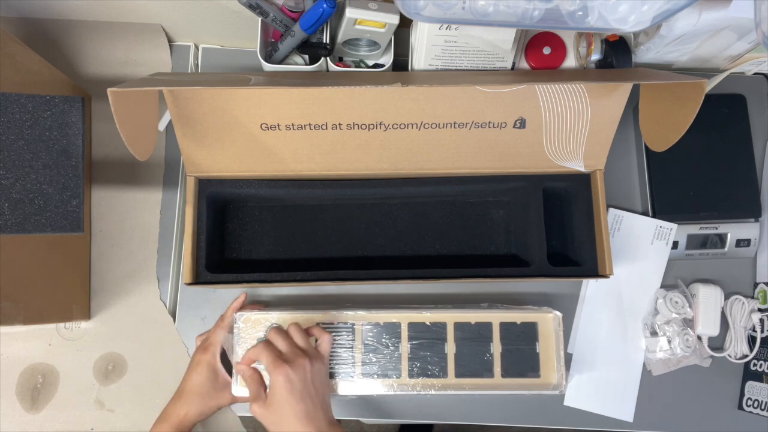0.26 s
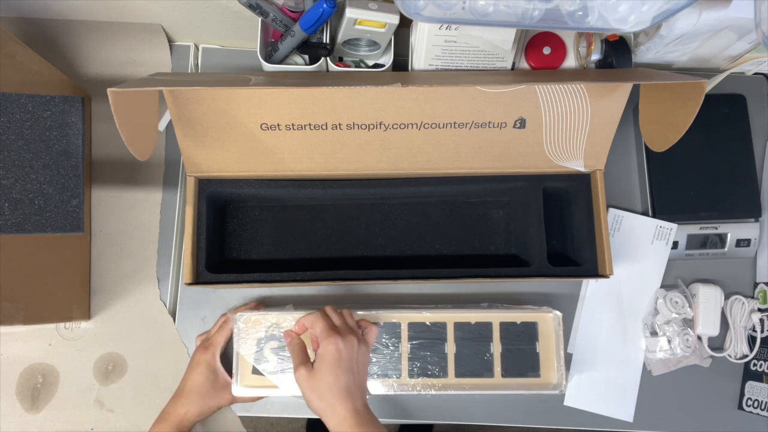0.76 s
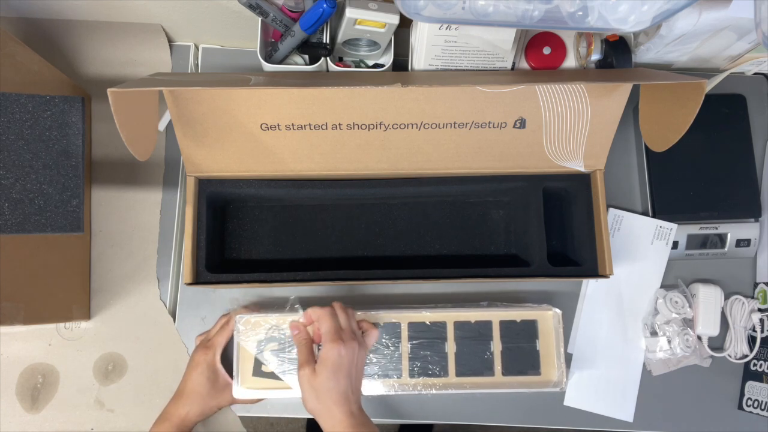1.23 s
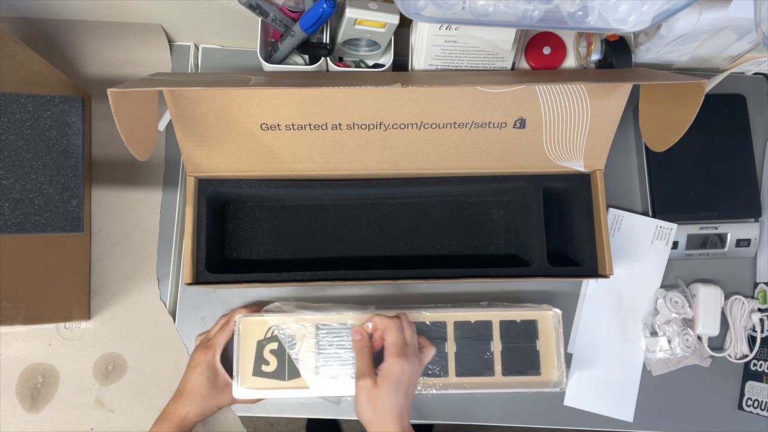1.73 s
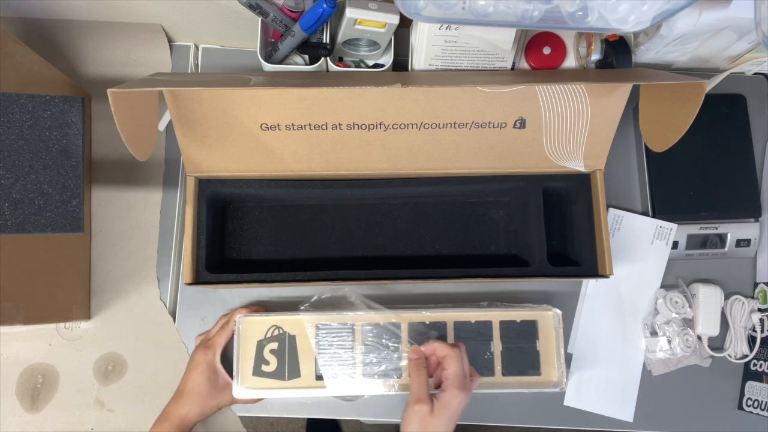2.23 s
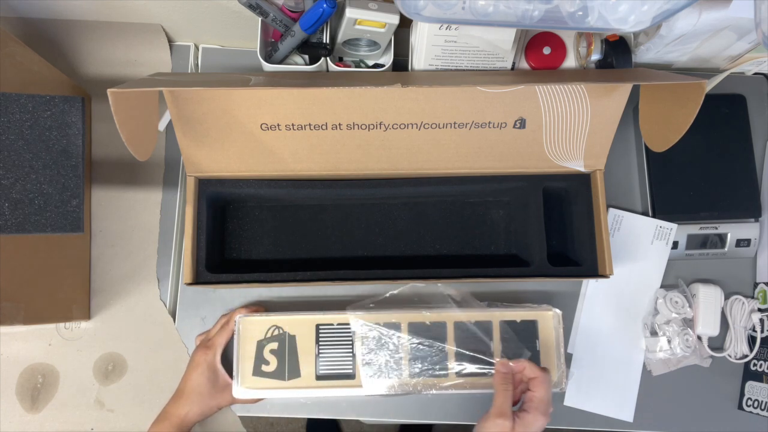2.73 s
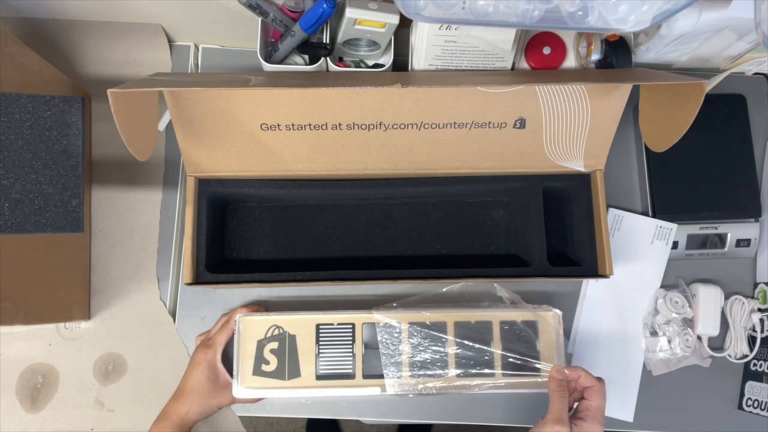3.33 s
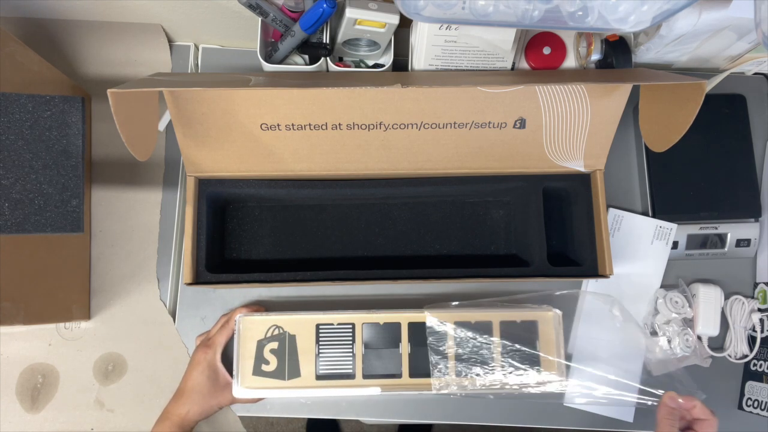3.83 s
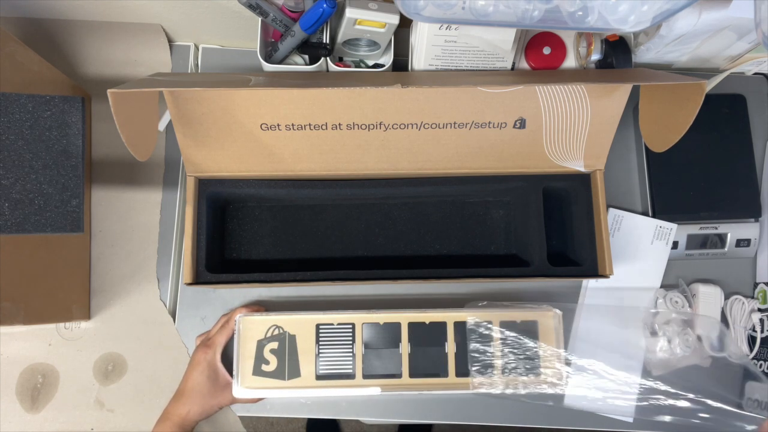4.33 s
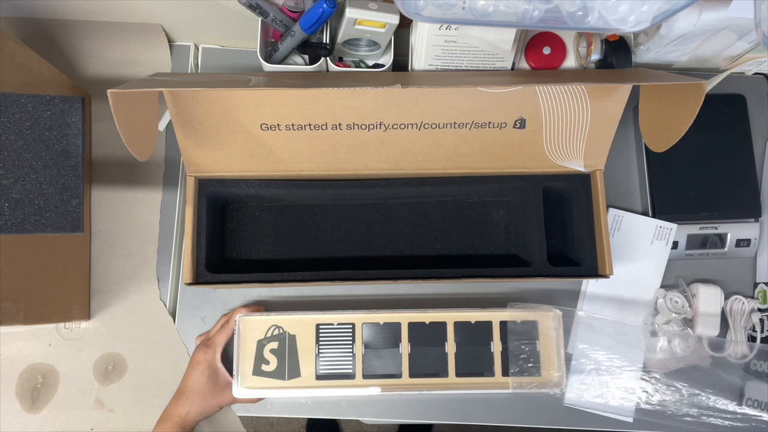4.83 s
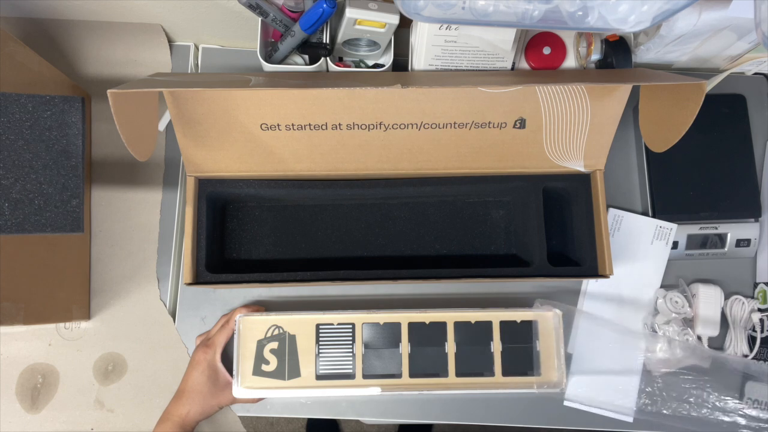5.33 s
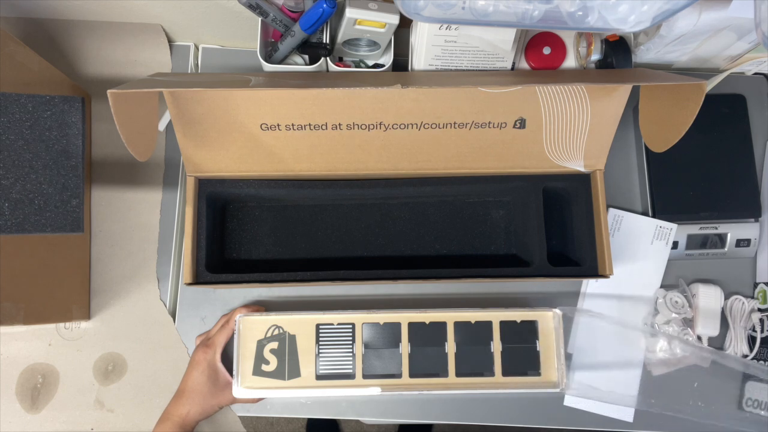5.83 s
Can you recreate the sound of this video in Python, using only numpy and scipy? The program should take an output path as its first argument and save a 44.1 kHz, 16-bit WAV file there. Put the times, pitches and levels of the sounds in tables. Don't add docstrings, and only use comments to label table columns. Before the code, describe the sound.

Close-up plastic film peeling: short scratchy tugs and crackles, then long rasping zips with a hollow woody ring, in a quiet room.

```python
import sys
import numpy as np
from scipy import signal
from scipy.fft import rfft, irfft
from scipy.io import wavfile
from scipy.ndimage import uniform_filter1d, map_coordinates

SR = 44100
rng = np.random.default_rng(int(sys.argv[2]) if len(sys.argv) > 2 else 0)


def transcribe(signal):
    frames = np.atleast_2d(signal).T
    limited = np.clip(frames, -1, 1)
    pcm = np.round(limited * 32767).astype(np.int16)
    wavfile.write(sys.argv[1], SR, pcm)


def linear_from_db(decibels):
    return 10 ** (np.asarray(decibels, float) / 20)


N = 267687
T = np.arange(N) / SR
HZ = np.fft.rfftfreq(N, 1 / SR)

# (start [s], length [s], hiss at start [dB], hiss at end [dB])
TUGS = [(0, 0.12, -42, -35.5), (0.112, 0.086, -38.5, -40), (0.19, .026, -48, -53),
        (0.223, 0.0053, -41, -56), (0.26, 0.15, -69, -77), (0.454, 0.072, -61, -56.5),
        (0.524, 0.13, -44, -42), (0.667, 0.045, -50, -56.5), (0.74, 0.19, -63.5, -65),
        (0.954, 0.22, -51, -44.5), (1.195, 0.035, -37.5, -35), (1.231, .012, -36, -32),
        (1.262, 0.01, -32, -35), (1.278, 0.025, -35.5, -38), (1.352, 0.15, -55, -33.5),
        (1.47, 0.28, -35.5, -38), (1.761, 0.15, -35.5, -42), (1.89, 0.18, -41, -44.5),
        (2.043, 0.15, -36, -36), (2.214, 0.14, -34.5, -37), (2.368, 0.25, -37, -32.5),
        (2.633, 0.078, -34, -34.5), (2.726, 0.09, -35.5, -36), (2.824, 0.072, -35, -33),
        (2.909, 0.16, -32.5, -38), (3.268, 0.042, -61, -61), (3.362, 0.055, -35.5, -33.5),
        (3.42, 0.099, -33, -33.5), (3.529, 0.16, -33.5, -35), (3.704, 0.29, -36, -35),
        (4.008, 0.22, -33.5, -35.5), (4.245, 0.23, -34.5, -35), (4.45, 0.18, -36.5, -37.5),
        (4.632, 0.29, -37.5, -32.5), (4.905, 0.1, -34.5, -35.5), (5.008, .07, -36, -40.5),
        (5.101, 0.084, -39.5, -32.5), (5.204, 0.23, -32, -35.5), (5.373, 0.18, -34, -34.5),
        (5.518, 0.21, -40.5, -30.5), (5.699, 0.23, -30.5, -38), (5.956, 0.025, -33, -33),
        (5.981, .012, -28, -35.5)]
GRIP_DB_PER_S, LET_GO_DB_PER_S, CREEP_DB = 656, 497, -77.5
SLIPS_PER_S, SLIP_S, SLIP_DB = 75, .003, 9
# (frequency [Hz], level [dB per Hz])
FILM_SPECTRUM = [(120, -18.5), (300, -16), (1000, -9.5), (2500, -1), (4300, -2), (7000, -2), (9000, -5),
                 (12000, -11), (16000, -13.5)]
# (peeled share [0-1], treble [dB])
SHEEN = [(0, 0.5), (.05, -1), (.2, 0.5), (.35, 0.5), (.44, -0.5), (.5, 0), (.65, 0), (.78, -1.5),
         (.86, -3.5), (.92, -3), (1, -2)]
SHEEN_HZ = 4800
# (frequency [Hz], width [Hz], level [dB])
PANEL_MODES = [(1332, 61, -7), (1531, 66, -2), (1764, 91, -2)]
BOARD_MODES = [(817, 360, -5.5), (963, 106, 1), (1059, 90, 0)]
HOLLOW_MODES = [(224, 55, -14), (379.5, 40, -11), (525, 38, 3), (565, 22, 1), (610, 50, -2)]
PANEL_MID_MODES = [(1998, 89, -2.5), (2285, 63, 2.5), (2510, 98, -4.5)]
PANEL_TOP_MODES = [(2850, 77, -8), (3020, 88, -2), (3300, 93, 0), (3410, 45, -16), (3670, 80, -8)]
# (peeled share [0-1], panel [dB], board [dB], hollow [dB])
ZONES = [(0, -15, 0.5, -6), (.022, 0, -0.5, -14), (0.044, -3, -2.5, 2), (0.047, -1.5, -12, -14.5),
         (.23, -11.5, -15, -13.5), (.3, 1.5, -8, -12.5), (.34, -2.5, -6.5, -12.5), (.38, -2, -11, -24),
         (.42, -0.5, -11, -19), (.45, -2.5, -9, -12), (.48, 2, -12, -18), (.56, 2.5, -15, -23),
         (.6, 1.5, -18, -18), (.64, 2, -17, -23), (.68, -0.5, -27, -20), (.72, -0.5, -11, -11),
         (.76, -2, -18.5, -13.5), (.78, 3, -13, -7.5), (0.798, 1.5, -16, -3.5), (.83, 4, -12.5, -7.5),
         (.86, 3.5, -11, -3.5), (.89, 7, -12, -4.5), (.94, 1.5, -12, -9), (1, 2.5, -4.5, -9)]
# (peeled share [0-1], middle modes [dB], top modes [dB])
UPPER_ZONES = [(0, -6, -15), (.04, 1, -3), (.05, -8, -3), (.15, -31, -11), (.23, -10, -16), (.3, 4, 1),
               (.34, -1.5, -2), (.38, 3.5, -2), (.42, 2.5, -5), (.45, -1.5, -18), (.48, 2.5, -8),
               (0.532, -2.5, -37), (.58, -3, -6), (.64, -7, -5), (.72, -2, -13), (.8, -9, -3),
               (.86, -6, -3.5), (.9, 0, 3), (.93, 1, -5), (1, -1.5, -2)]
SLACK_RING_DB = 0.5
# (time [s], pitch [Hz], level over the hiss [dB])
STRIP = [(0, 2310, -16), (.1, 2270, 1), (.17, 2260, -15), (.2, 2300, -40), (2.3, 3150, -40),
         (2.45, 3130, -14), (2.7, 3270, -2), (2.95, 3300, -6), (3.1, 3400, -38), (6.07, 3350, -37)]
STRIP_WIDTH_HZ = 60
# (time [s], peak [dB], top octave over middle [dB])
TICKS = [(0.333, -37, 0), (.3755, -53, -9), (0.3967, -56, -2), (.416, -48, 6), (.4205, -47, -11),
         (0.431, -50, 8), (.4509, -37, 4), (.4558, -32, -6), (.5057, -25, -4), (.4928, -31, 5),
         (.5152, -35, 3), (.6754, -30, -11), (.709, -32, -6), (.7587, -28.5, 8), (.775, -33, -6),
         (0.782, -42, -3), (.789, -40, -6), (.811, -33, 10), (0.816, -37, -1), (.827, -32, -4),
         (.853, -43, -17), (.8564, -30, 9), (0.862, -36, 6), (0.8807, -33, 2), (.8845, -39, 10),
         (.895, -38, 11), (.9085, -38, 0), (.922, -37, -5), (0.933, -25, 15), (0.937, -30, 5),
         (.9465, -27, -4), (.9575, -26, -7), (.9705, -39, -11), (.980, -29, -6), (0.9948, -24, 3),
         (1.0145, -26, 2), (1.034, -26, 0), (1.063, -17, 2), (1.082, -26, -3), (1.0995, -30, -7),
         (1.116, -32, -5), (1.1455, -33, 0), (1.192, -23, 0), (1.41, -25, 3), (2.031, -16.5, 2),
         (3.188, -32, 0), (3.226, -42.5, 1), (3.239, -39, 0), (3.2824, -36, 0), (3.2894, -30, 4),
         (3.294, -33, 0), (3.3044, -31, -1), (3.320, -33, 3)]
# (time [s], peak [dB])
NAIL_CATCHES = [
    (0.2242, -20.5),
    (0.227, -27),
    (0.2288, -16),
    (0.448, -31),
    (3.338, -33),
    (3.3492, -31),
    (3.358, -24),
]
TICK_KNOCK_DB, NAIL_KNOCK_DB = -38, -5.5
# (frequency [Hz], level [dB per Hz])
CREASE_SPECTRUM = [(1000, -40), (3000, -21), (5500, -8.5), (8000, -8.5), (11000, -11), (16000, -16)]
CRACKLE_PER_S, CRACKLE_DB = 81, -69
TICK_TOP_HZ = 8060
# (time [s], peak [dB])
PATS = [(0.309, -45), (.327, -52), (.349, -51), (.722, -53), (0.733, -50), (0.748, -50), (.755, -54),
        (0.764, -54), (.774, -57), (0.86, -47.5), (.930, -51), (0.953, -51), (1.521, -31.5), (3.348, -39)]
PAT_S = .004
# (frequency [Hz], width [Hz], level [dB])
PAT_MODES = [(450, 190, -2), (1012, 350, -0.5), (1540, 510, -1)]
# (time [s], peak [dB], pitch [Hz])
THUMPS = [(0.047, -28.5, 99.4), (0.059, -27.5, 78.3), (0.117, -33, 64), (0.158, -35.5, 88.4),
          (0.752, -40, 76.7), (1.196, -40, 64), (1.277, -36, 77.6), (1.447, -43, 97), (1.529, -36, 81),
          (1.65, -41, 58.3), (1.769, -49, 55.7), (3.11, -39.5, 215), (5.968, -36, 55.4)]
# (time [s], left port leads by [ms])
FRONT_LEAD = [(0, 0.15), (1, 0.2), (2, 0.16), (2.6, 0.081), (3.2, 0.046), (4, 0.027), (5, -0.026),
              (6, -0.086)]
# (time [s], left port late [ms], right port late [ms])
LID_DELAY = [(0, 3.1, 2.9), (1, 3.4, 2.8), (3.3, 3.3, 2.7), (4, 3.05, 2.6), (5, 2.7, 2.65),
             (5.75, 2.42, 2.5), (6.07, 2.35, 2.45)]
LID_DB = -8
# (frequency [Hz], level [dB])
DESK_SPECTRUM = [(100, -7), (500, 1), (1400, -1), (3000, -1), (6000, 0.5), (16000, -4.5)]
DESK_T60_S, ROOM_T60_S, ROOM_DB = 0.067, 0.29, -5
RING_ECHO_DB, HOLLOW_ECHO_DB, TICK_ECHO_DB = -5.5, -5, -3.5
# (frequency [Hz], level [dB per Hz])
FAN_SPECTRUM = [(20, -39), (35, -34), (55, 6.5), (80, -0.5), (120, -12), (220, -15), (400, -22.5),
                (800, -40), (2000, -83), (6000, -58), (16000, -43)]
FAN_DB = -52.5
# (frequency [Hz], share [0-1])
COPY_SHARE = [(3500, 0), (5000, .4), (6800, .7), (7500, .955), (8600, .95), (9300, .85), (10200, .95),
              (16000, .99)]
COPY_TURN_HZ, COPY_ZERO_HZ = 4720, 5660
COPY_DRIFT_MS, COPY_FIRM_HZ = .005, 10500
# (time [s], level [dB])
LEAK = [(0, -5), (.45, -14), (.75, -5), (1.05, -30), (1.3, -6), (1.5, -30), (3.0, -26), (3.25, -4),
        (3.4, -30), (4.9, -26), (5.1, -5), (6.07, -4)]
LEAK_HZ, LEAK_WIDTH_HZ = 7900, 700
# (frequency [Hz], level [dB])
SHADE = [(4000, 0), (5200, 0), (6800, -4.5), (7800, 1)]
# (frequency [Hz], level [dB per Hz])
PORT_HISS_SPECTRUM = [(500, -22), (3000, -4), (8000, 5), (16000, -12)]
PORT_HISS_DB, TOP_HZ = -67, 15800


def unit(x):
    return x / np.sqrt(np.mean(x ** 2))


def on_log_hz(table):
    hz, value = np.transpose(table)
    return np.interp(np.log(HZ + 1), np.log(hz), value)


def over_time(table):
    return np.interp(T, *np.transpose(table))


def shape(x, gain):
    return irfft(rfft(x) * gain, N)


def modes(table):
    response = 0
    for k, (hz, width, db) in enumerate(table):
        response = response + (-1) ** k * linear_from_db(db) / (1 + 1j * (HZ ** 2 - hz ** 2) / (width * (HZ + 1)))
    return response


def walk(rate):
    hold = int(SR / rate)
    steps = rng.standard_normal(N)[np.arange(N) // hold]
    return unit(uniform_filter1d(steps, hold))


def peel():
    hiss_db = hand()
    speed = np.clip((hiss_db + 62.5) / 26, .03, 1)
    jerk_db = 0.53 * walk(15) + (2.4 - 2.29 * speed) * walk(45) + (3.5 - 3.19 * speed) * walk(160)
    slip_db = np.clip(1.9 - 2.3 * speed, 0, 1) * slips()
    pull = linear_from_db(hiss_db + jerk_db + slip_db)
    share = .25 * speed ** 3 + .03
    film = unit(linear_from_db(on_log_hz(FILM_SPECTRUM)))
    hiss = linear_from_db(2.5) * shape(pull * threads(share, 1.9), film)
    ends = np.array([pull * threads(share, 2.65) for _ in range(2)])
    ends = linear_from_db(4.5) * shape(ends, film * HZ ** 2 / (HZ ** 2 + 2500 ** 2))

    peeled = np.cumsum(speed) / np.sum(speed)
    ring = panel_ring(pull, speed, share, peeled)
    sheen = linear_from_db(np.interp(peeled, *np.transpose(SHEEN))) - 1
    high = 1 / (1 + (SHEEN_HZ / (HZ + 1)) ** 6)
    hiss = hiss + sheen * shape(hiss, high)
    ends = ends + sheen * shape(ends, high)
    return hiss, ends, ring + strip(pull * threads(share, 1.8))


def hand():
    hiss_db = np.full(N, 1. * CREEP_DB)
    for s, length, first_db, last_db in TUGS:
        lean = first_db + (last_db - first_db) * np.clip((T - s) / length, 0, 1)
        grip = GRIP_DB_PER_S * np.clip(s - T, 0, 1)
        let_go = LET_GO_DB_PER_S * np.clip(T - s - length, 0, 1)
        hiss_db = np.maximum(hiss_db, lean - grip - let_go)
    return hiss_db


def slips():
    kicks = (rng.random(N) < SLIPS_PER_S / SR) * rng.random(N)
    lurch = signal.lfilter([1], [1, -np.exp(-1 / (SLIP_S * SR))], kicks)
    return SLIP_DB * (np.minimum(lurch, 1) - .2)


def threads(share, spread_db):
    when, size, sign = rng.random(N), rng.exponential(size=N), rng.standard_normal(N)
    clicks = unit(sign * linear_from_db(spread_db * np.minimum(size, 4.6)))
    return (when < share) * clicks / np.sqrt(share)


def panel_ring(pull, speed, share, peeled):
    over_db = []
    for table in (ZONES, UPPER_ZONES):
        place, *columns = np.transpose(table)
        over_db += [np.interp(peeled, place, db) for db in columns]
    groups = (PANEL_MODES, BOARD_MODES, HOLLOW_MODES, PANEL_MID_MODES, PANEL_TOP_MODES)
    ring = 0
    for table, db, gain_db in zip(groups, over_db, (-5, -2.0, -4.0, -4.5, -2.5)):
        response = modes(table)
        level_db = gain_db + SLACK_RING_DB * (0.5 - speed) + db + 0.22 * walk(25)
        knocks = pull * linear_from_db(level_db) * threads(share, 2.3)
        ring = ring + shape(knocks, response / np.sqrt(np.mean(abs(response) ** 2)))
    return ring


def strip(knocks):
    s, hz, db = np.transpose(STRIP)
    turn = np.exp(2j * np.pi * np.cumsum(np.interp(T, s, hz)) / SR)
    pole = np.exp(-np.pi * STRIP_WIDTH_HZ / SR)
    driven = knocks * linear_from_db(np.interp(T, s, db)) / turn
    slow = signal.lfilter([np.sqrt(2 * (1 - pole ** 2))], [1, -pole], driven)
    return (slow * turn).real


def ticks():
    crack, top, knock, t = np.zeros(N), np.zeros(N), np.zeros(N), T[:900]
    rows = [(*row, TICK_KNOCK_DB) for row in TICKS]
    rows += [(s, db, 0, NAIL_KNOCK_DB) for s, db in NAIL_CATCHES]
    chance = rng.standard_normal((len(rows), len(t)))
    band = signal.butter(2, [4000, 8000], "band", fs=SR)
    bright = signal.lfilter(*band, chance * np.exp(-t / .0011))
    strength = np.linalg.norm(bright, axis=1, keepdims=True)
    chance = chance * strength.mean() / strength
    for (s, db, top_db, bass_db), noise in zip(rows, chance):
        i, burst = int(s * SR), noise * np.exp(-t / 0.0012)
        crack[i:i + len(t)] += linear_from_db(db + 7.5 - top_db / 2) * burst
        top[i:i + len(t)] += linear_from_db(db + 2.5 + top_db / 2) * burst
        knock[i:i + len(t)] += linear_from_db(db + bass_db + 0.5) * noise * np.exp(-t / 0.0016)
    faint = (rng.random(N) < CRACKLE_PER_S / SR) * linear_from_db(CRACKLE_DB + 2.0 * rng.exponential(size=N))
    faint = np.convolve(faint, np.exp(-t / 0.0011))[:N] * rng.standard_normal(N)
    high = 1 / (1 + (TICK_TOP_HZ / (HZ + 1)) ** 10)
    crease = linear_from_db(on_log_hz(CREASE_SPECTRUM))
    middle_sound = shape(crack + faint, crease * (1 - high))
    top_sound = shape(top + faint, crease * high)
    return middle_sound + top_sound + shape(knock, modes([(1060, 1200, 5.0)]))


def pats():
    taps, t = np.zeros(N), T[:1500]
    for (s, db), noise in zip(PATS, rng.standard_normal((len(PATS), len(t)))):
        i = int(s * SR)
        taps[i:i + len(t)] += linear_from_db(db + 13.0) * noise * np.exp(-t / PAT_S)
    return shape(taps, modes(PAT_MODES))


def thumps():
    out, t = np.zeros(N), T[:6000]
    for s, db, hz in THUMPS:
        i, turns = int(s * SR), hz * t
        ring = np.sin(2 * np.pi * turns) + 0.41 * np.sin(2 * np.pi * 2.74 * turns)
        swell = turns / 1.93 * np.exp(1 - turns / 0.94)
        out[i:i + len(t)] += (linear_from_db(db) * swell * ring)[:N - i]
    return out


def lid_bounce(near, ends):
    s, *late_ms = np.transpose(LID_DELAY)
    bounce = []
    for ms, end in zip(late_ms, ends):
        delay = np.interp(T, s, ms) * SR / 1000
        bounce.append(map_coordinates(near + end, [np.arange(N) - delay], order=3))
    return linear_from_db(LID_DB) * shape(np.array(bounce), HZ ** 2 / (HZ ** 2 + 1500 ** 2))


def tail(t60):
    t = T[:SR // 2]
    echo = rng.standard_normal((2, len(t))) * 1e3 ** (-t / t60) * (t > .0008)
    return echo / np.sqrt(np.sum(echo ** 2, axis=1, keepdims=True))


def echoes(near, count=120):
    near, hop = shape(near, linear_from_db(on_log_hz(DESK_SPECTRUM))), N // count + 1
    fade = np.sin(np.pi * np.arange(2 * hop) / (2 * hop))
    near, out = np.pad(near, (hop, 2 * hop)), np.zeros((2, N + 4 * hop + SR))
    for start in range(0, N + hop, hop):
        paths = tail(DESK_T60_S) + linear_from_db(ROOM_DB) * tail(ROOM_T60_S)
        stretch = near[start:start + 2 * hop] * fade
        wet = signal.fftconvolve(stretch[None], paths, axes=1)
        out[:, start:start + wet.shape[1]] += wet
    return out[:, hop:hop + N]


def fan():
    spectrum = linear_from_db(on_log_hz(FAN_SPECTRUM))
    mid, side = (shape(linear_from_db(walk(3.28)) * rng.standard_normal(N), spectrum) for _ in range(2))
    side = shape(side, np.clip(HZ / 500 + 0.079, 0, 1))
    left = shape(mid + side, linear_from_db(-3.5 / (1 + (HZ / 130) ** 2)))
    return linear_from_db(FAN_DB) * unit(np.array([left, mid - side]))


def scene():
    hiss, ends, ring = peel()
    clicks = ticks() + pats()
    near = hiss + ring + clicks
    lead = over_time(FRONT_LEAD) * SR / 1000
    direct = np.array([map_coordinates(near, [np.arange(N) + lead], order=3), near])
    direct += lid_bounce(hiss + clicks, ends)
    upper_db = (RING_ECHO_DB - .6) / (1 + (1100 / (HZ + 1)) ** 4)
    lower_db = HOLLOW_ECHO_DB / (1 + (HZ / 680) ** 8)
    echoing_ring = shape(ring, linear_from_db(0.8 + upper_db + lower_db))
    wet = linear_from_db(-0.5) * echoes(hiss + echoing_ring + linear_from_db(TICK_ECHO_DB) * clicks + ends.mean(0))
    return linear_from_db(0.5) * (direct + ends + wet) + thumps() + fan()


def low_pass(x):
    return signal.sosfilt(signal.butter(12, 16940, fs=SR, output="sos"), x)


def record(dry):
    share = np.clip(on_log_hz(COPY_SHARE), 0, 1)
    drift = COPY_DRIFT_MS * SR / 1000 * walk(9)
    drifting = map_coordinates(dry[1], [np.arange(N) + drift], order=5)
    late = np.exp(-2j * np.pi * (HZ - COPY_ZERO_HZ) / COPY_TURN_HZ)
    left = shape(dry[0], np.sqrt(1 - share ** 2))
    left += shape(drifting, share * late * (HZ < COPY_FIRM_HZ))
    left += shape(dry[1], share * late * (HZ >= COPY_FIRM_HZ))
    leak_band = np.exp(-((HZ - LEAK_HZ) / LEAK_WIDTH_HZ) ** 2)
    left += shape(dry[0] * linear_from_db(over_time(LEAK)), leak_band)
    left = shape(left, linear_from_db(on_log_hz(SHADE)))
    hiss = shape(rng.standard_normal((2, N)), linear_from_db(on_log_hz(PORT_HISS_SPECTRUM)))
    pair = np.array([left, dry[1]]) + linear_from_db(PORT_HISS_DB) * unit(hiss)
    return low_pass(shape(pair, HZ < TOP_HZ))


dry = scene()
out = record(dry)
transcribe(out)
```